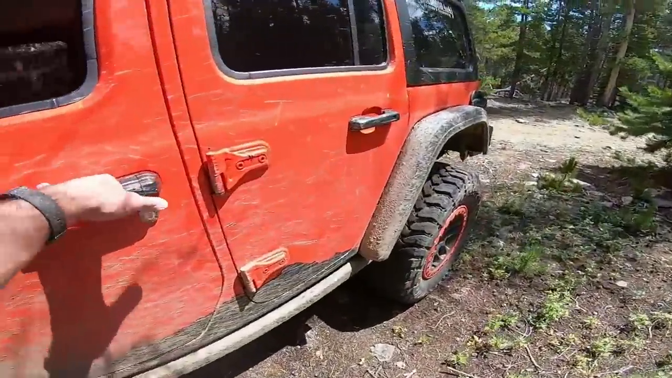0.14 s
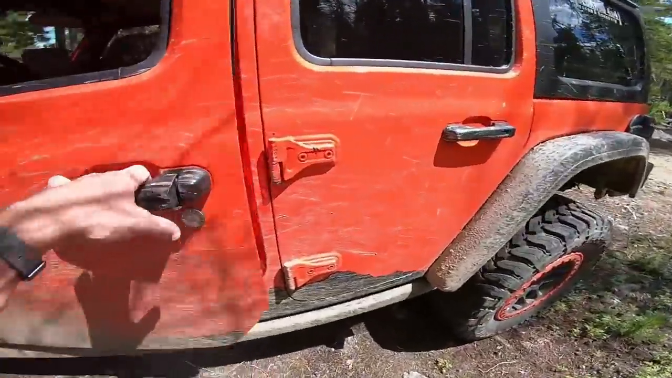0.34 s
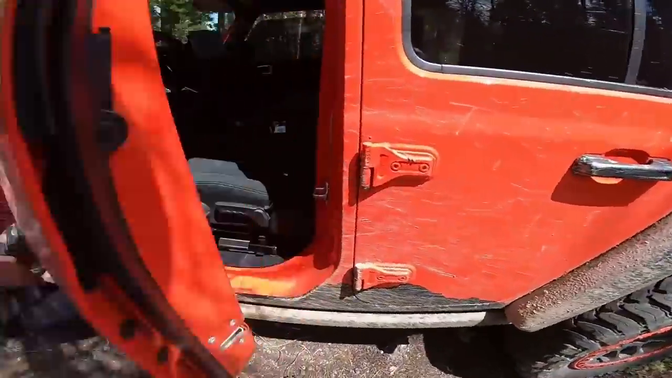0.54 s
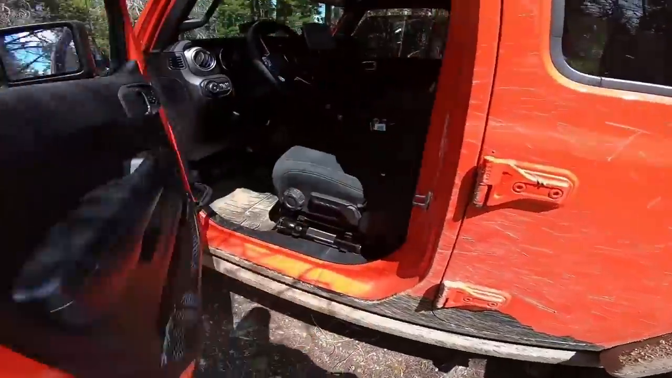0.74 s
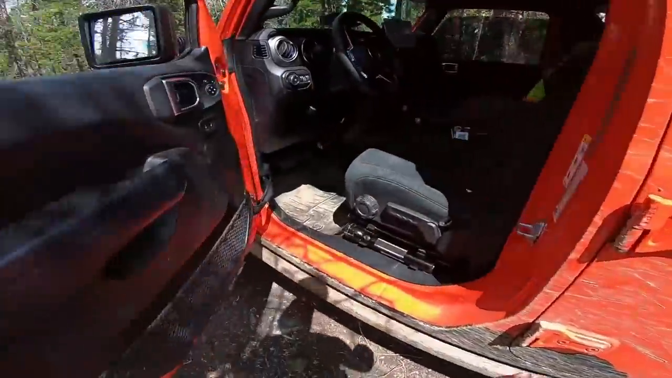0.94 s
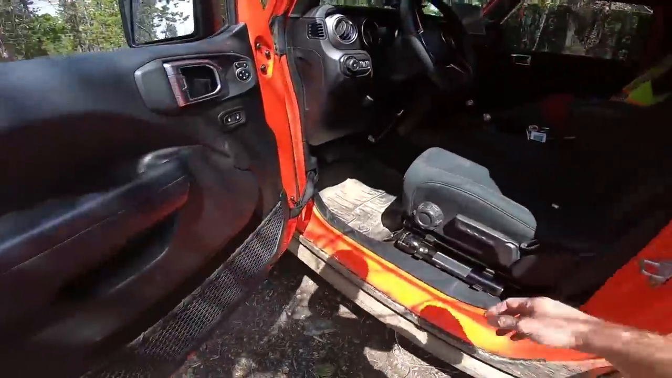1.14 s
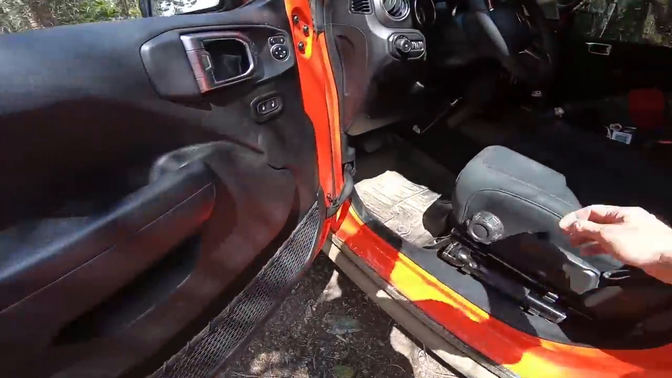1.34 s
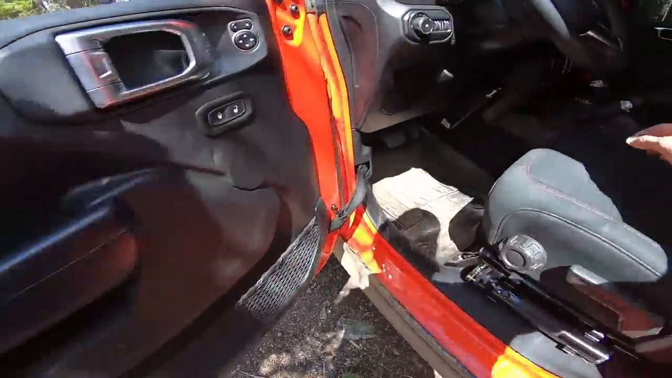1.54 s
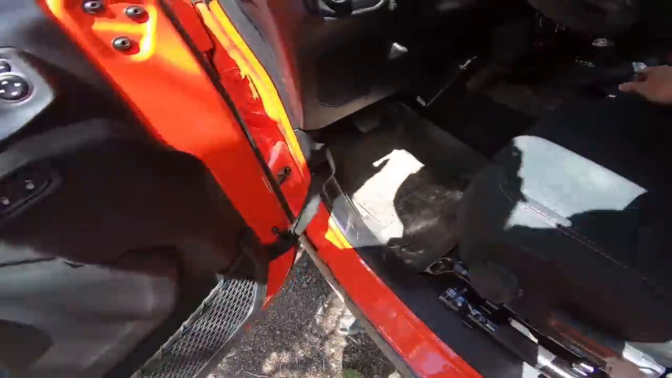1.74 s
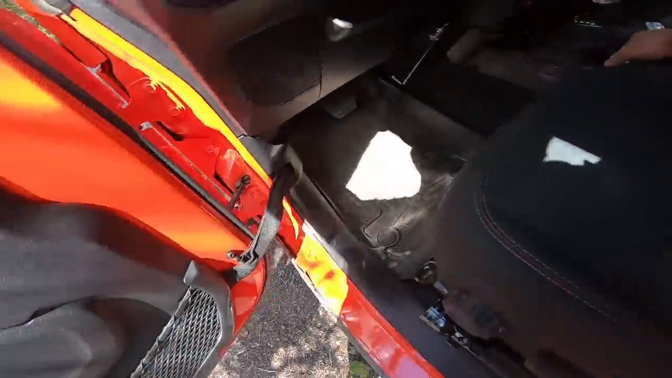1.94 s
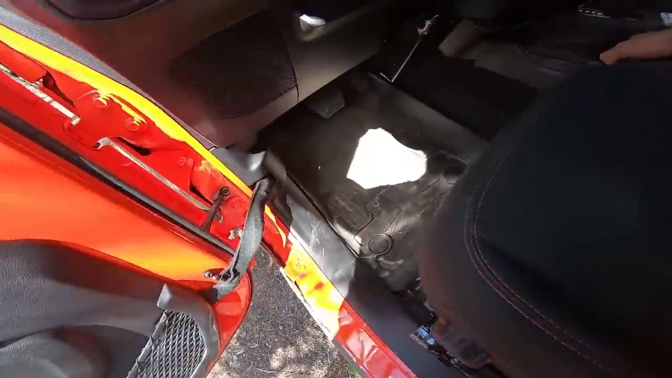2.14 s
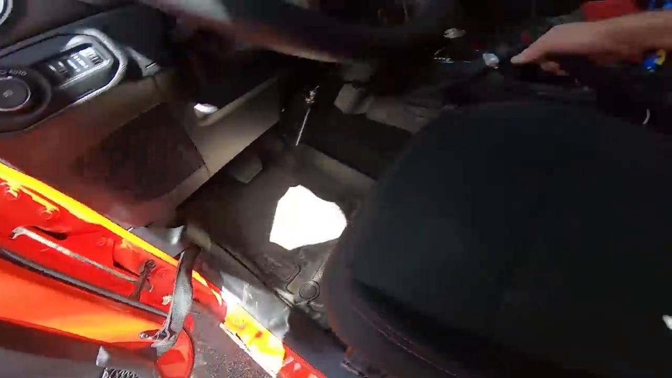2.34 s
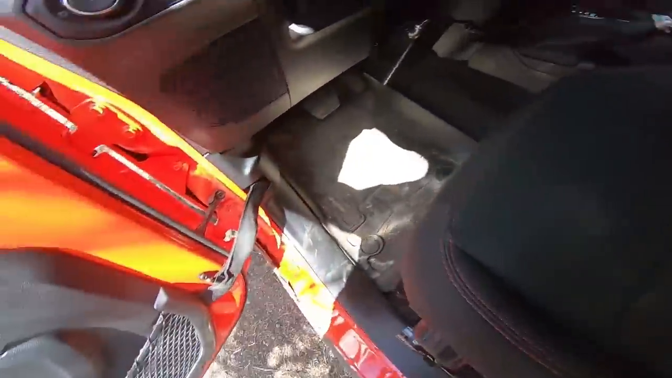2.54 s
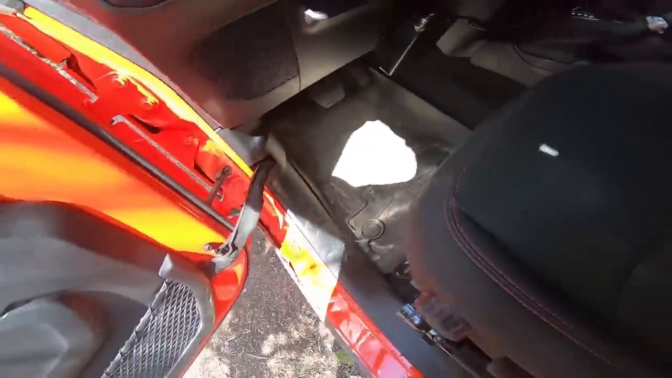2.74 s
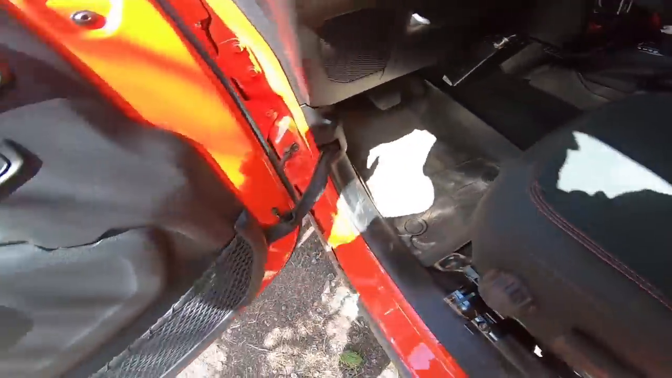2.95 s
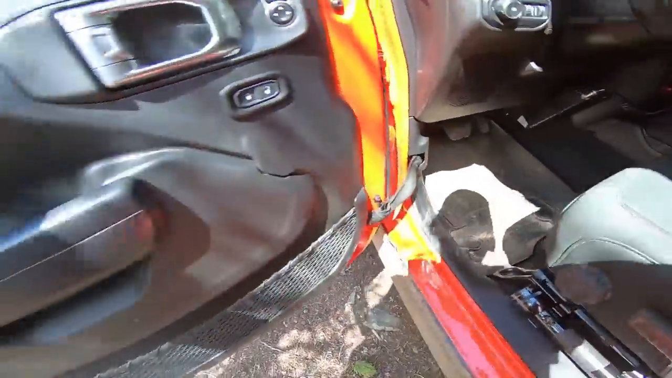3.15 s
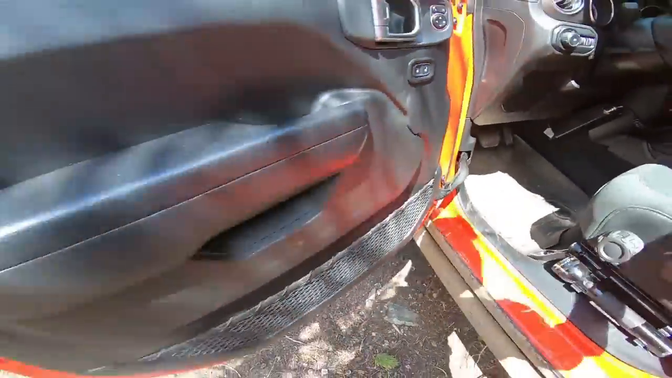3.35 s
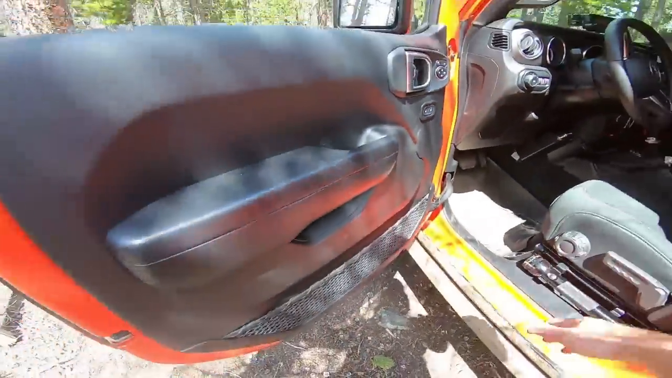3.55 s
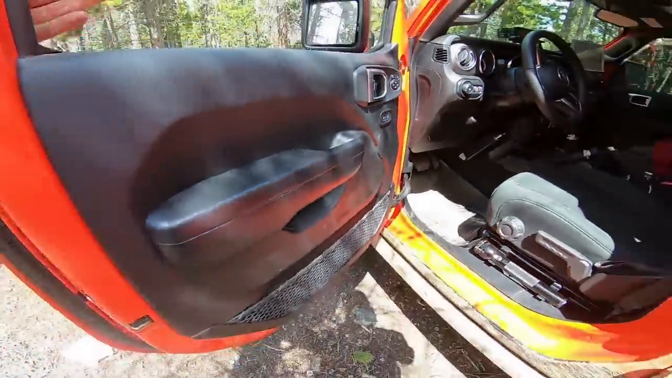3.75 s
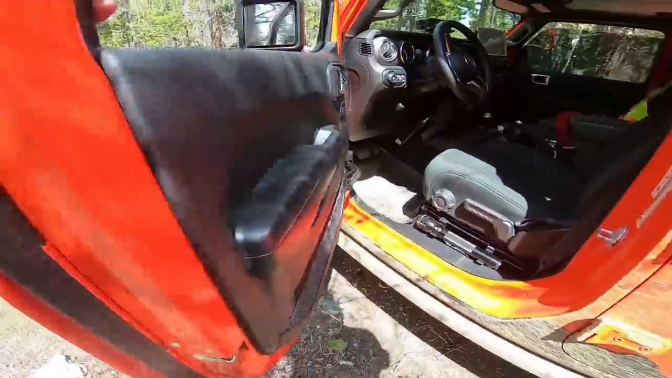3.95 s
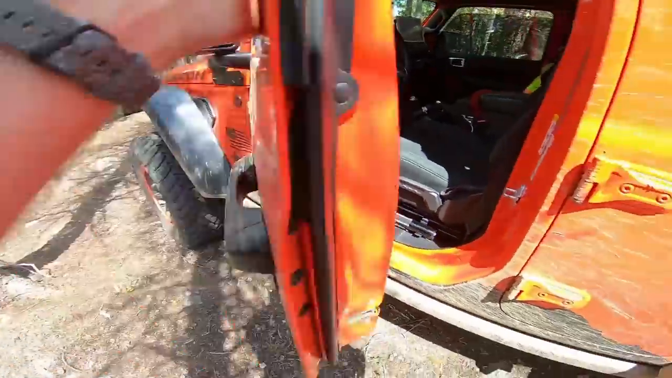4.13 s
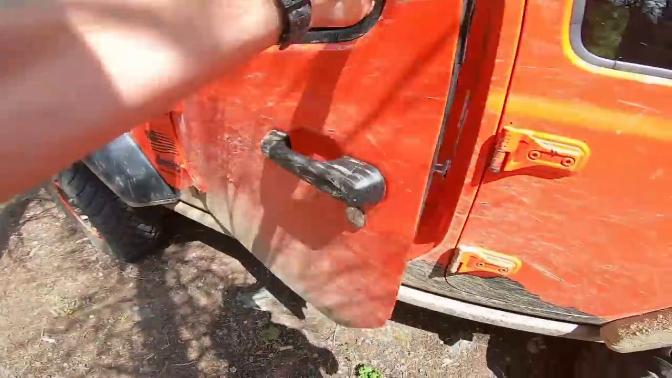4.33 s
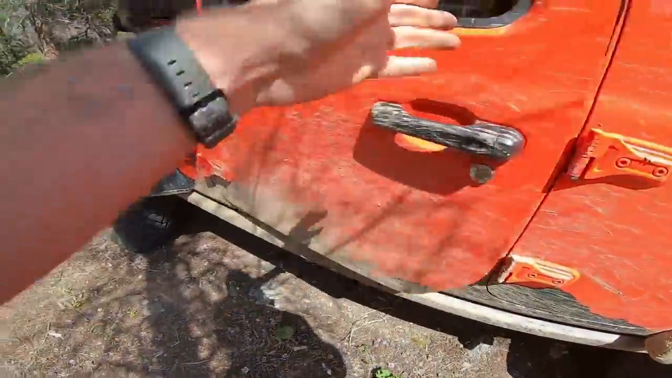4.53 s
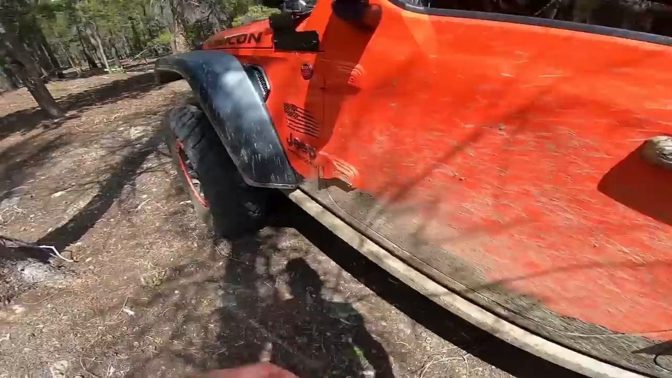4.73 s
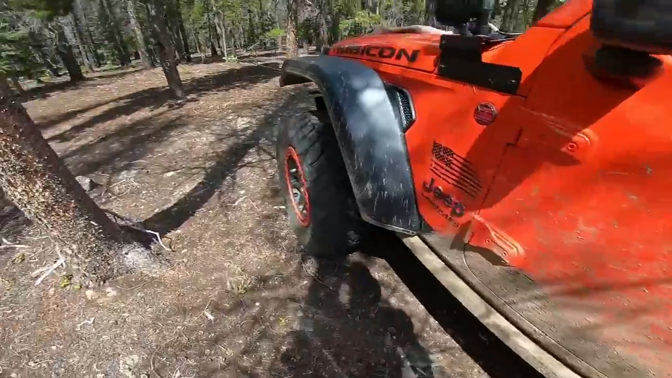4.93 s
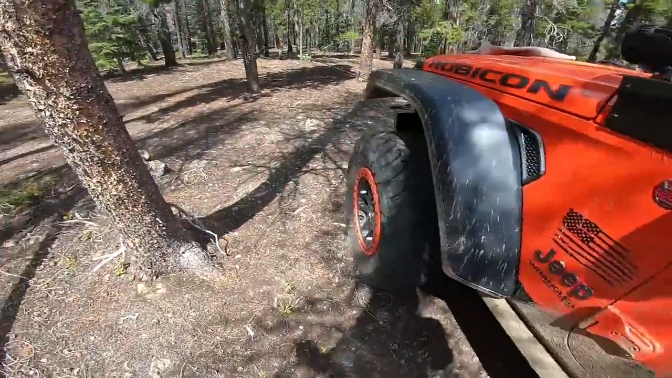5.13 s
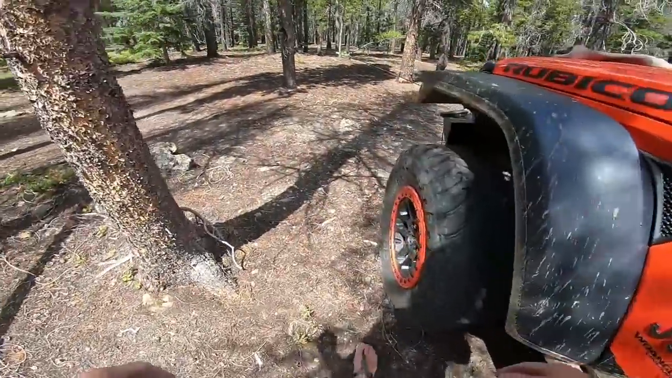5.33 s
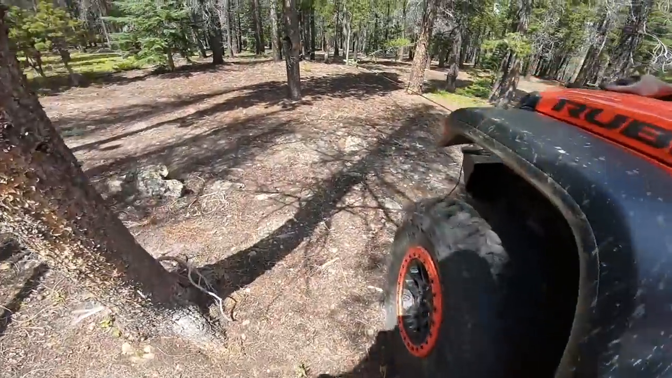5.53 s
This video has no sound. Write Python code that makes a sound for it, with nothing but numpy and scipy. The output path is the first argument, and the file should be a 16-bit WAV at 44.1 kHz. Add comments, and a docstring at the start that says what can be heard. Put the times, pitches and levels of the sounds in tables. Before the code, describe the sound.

A quiet forest with faint steady hiss, heard close up by a small body-worn camera. A hand touches the door handle at about 0.1 s; at 0.3-0.4 s the handle and latch give a tight cluster of hard metallic clunks, with a lighter knock near 0.5 s. The door reaches its stop at 0.75 s with a dull knock. Low wind puffs buffet the microphone from 0.7 to 1.7 s, over cloth rustle and small clicks. A trim knock falls near 2.0 s. At 2.4-2.55 s a lever scrapes with a short dry rasp between deep, boxy thuds. From 3 to 4 s the image narrows nearly to mono, with soft rustling and scuffs. The door knocks at 4.2 s, then slams at 4.75-4.85 s, the loudest event, with heavy low ringing and rattling rebounds. Weak thumps, boot rustle and fine grit crackles fade out by 5.6 s.

```python
"""In a forest, heard by a small worn camera, the handle of an off-road vehicle is pulled, the latch lets go and
the door swings to its stop; then someone leans into the cab, works a lever that rasps and thuds, steps back and
slams the door. Wind puffs on the ports early on, cloth and boots rustle, and the stereo narrows for a while.
Blows excite decaying modes and jolt the camera; clicks, scuffs, rasp, rustle and the low rumble of wind and of
shaking are shaped noise; grit is a train of snaps."""
import sys
import numpy as np
from scipy import signal
from scipy.fft import rfft, irfft, next_fast_len
from scipy.io import wavfile
from scipy.ndimage import uniform_filter1d

SR = 44100
rng = np.random.default_rng(int(sys.argv[2]) if len(sys.argv) > 2 else 0)


def generate_wav(signal):
    """Clip the signal to [-1, 1] and save it as 16-bit WAV at the path in sys.argv[1]."""
    frames = np.transpose(np.atleast_2d(signal))
    scaled = np.clip(frames, -1, 1) * 32767
    pcm = np.round(scaled).astype(np.int16)
    wavfile.write(sys.argv[1], SR, pcm)


N = 246203  # length in samples


def gain_of(db):
    """Level: decibels are twenty times the logarithm of an amplitude factor."""
    return 10 ** (np.asarray(db) / 20)


def evened(x):
    """Normalization: scales a signal to unit rms."""
    return x / np.sqrt(np.mean(x ** 2) + 1e-20)


def spectrum_at(points, hz):
    """Spectral envelope: straight lines between the points on a logarithmic frequency axis."""
    f, value = np.transpose(points)
    return np.interp(np.log(hz + 1), np.log(f + 1), value)


def curves_at(rows, t):
    """Time envelopes: every column of a curve table, interpolated at the times t."""
    s, *rest = np.transpose(rows)
    return [np.interp(t, s, column) for column in rest]


def add(mix, s, sound):
    """Superposition: sums a sound into the mix from s seconds on."""
    part = mix[..., max(round(s * SR), 0):][..., :sound.shape[-1]]
    part += sound[..., :part.shape[-1]]


def left_right(db):
    """Level difference: half goes to each side, positive towards the left."""
    return np.array([[db / 2], [-db / 2]])


def ringing(rings, hz):
    """Resonance: peaks of given bandwidth stand on a flat floor of 1."""
    return 1 + sum(gain_of(db) / abs(1 + 2j * (hz - f) / width) for f, width, db in rings)


def ports(a, b, hz):
    """Coherence: a shared and an opposed part make two ports alike in the bass and less so above."""
    # left-right likeness: f/Hz, correlation before the cavity resonance
    likeness = [(60, 0.96), (300, 0.92), (700, 0.63), (1300, 0.13), (2000, 0.23), (3100, 0.47),
                (6800, 0.19), (15000, 0.15)]
    # cavity between the ports, ringing in opposite phase: f/Hz, bandwidth/Hz, level/dB
    cavity = (1290, 100, 13.5)
    same = np.clip(spectrum_at(likeness, hz), -1, 1)
    mid = np.sqrt((1 + same) / 2)
    side = np.sqrt((1 - same) / 2) * ringing([cavity], hz)
    return np.array([mid * a + side * b, mid * a - side * b])


def pair(gain, seconds):
    """Filtered noise: two partly coherent channels with the spectrum gain(hz), at unit rms."""
    size = next_fast_len(round(seconds * SR))
    hz = np.fft.rfftfreq(size, 1 / SR)
    a, b = rfft(rng.standard_normal((2, size)))
    return evened(irfft(ports(a, b, hz) * gain(hz), size))


def struck(blows, modes, dense_db, shudder_s):
    """Modal excitation: a soft push and a short shudder drive a set of decaying modes."""
    t = np.arange(2 * SR // 5) / SR
    hz, level_db, t60 = np.transpose(modes)[:, :, None]
    fall = gain_of(level_db - 60 * t / t60) * np.cos(np.pi / 2 * t / t[-1])
    signs = (-1) ** np.arange(len(modes))
    ring = signs @ (fall * np.sin(2 * np.pi * hz * t))
    out = np.zeros(N)
    noise = rng.standard_normal((len(blows), SR // 8))
    # detuning and phase of small neighbouring modes, drawn anew for each blow
    near = rng.uniform(-1, 1, (len(blows), 2, len(modes), 1))
    for (s, db, contact_ms, shudder_db), jitter, (tune, turn) in zip(blows, noise, near):
        dense = (fall * np.sin(2 * np.pi * hz * (1 + .1 * tune) * t + np.pi * turn)).sum(0)
        dense *= gain_of(dense_db) * np.minimum(t / 0.0054, 1)
        force = jitter * gain_of(-60 * t[:len(jitter)] / max(shudder_s, .005))
        force *= gain_of(shudder_db) / np.linalg.norm(force)
        force[0] += 1  # the blow itself
        push = signal.windows.hann(max(int(contact_ms * SR / 1000), 3))
        sound = signal.fftconvolve(signal.fftconvolve(force, push), ring + dense)
        add(out, s, gain_of(db) * sound / abs(sound).max())
    return out


def click(db, ring_hz, low_db, high_db, t60, pan_db, rise_ms=1.0):
    """Damped impact: broad noise whose treble dies first, with a rough short ring of the part hit."""
    # latch and panels: f/Hz, bandwidth/Hz, level/dB
    metal = [(1830, 100, -2.5), (2450, 160, -6.5), (3030, 170, -2.5), (4100, 250, -5.5), (5050, 310, -3)]
    ring_spread = .22  # half-amplitude width as a share of the ringing frequency
    ring_db, ring_soft_db_per_ms = -.6, .4  # a soft contact rings less
    ring_share, ring_loss_per_db = 0.23, 0.06  # the thinner the part (the less low mids), the more it rings
    broad = [(150, low_db - 6.5), (700, low_db + 5.5), (2500, 0.016),
             (7500, high_db), (9500, high_db - 3.0), (11500, high_db - 26.0)]  # f/Hz, level/dB
    noise = pair(lambda hz: gain_of(spectrum_at(broad, hz)) * ringing(metal, hz), .25)
    t = np.arange(noise.shape[1]) / SR
    t60 = max(t60, .008)
    share = np.clip(ring_share - ring_loss_per_db * low_db, 0, 1)
    rise = np.minimum(t / (max(rise_ms, .2) / 1000), 1)
    t = np.maximum(t - rise_ms / 1000, 0)  # the decay starts after the rise

    dull = signal.sosfilt(signal.butter(2, 1800, fs=SR, output="sos"), noise)
    bright = noise - dull
    tail = gain_of(-23 - 60 * t / 0.34)  # nearby panels leave a short tail
    burst = dull * (gain_of(-60 * t / t60) + tail)
    burst = burst + bright * (gain_of(-60 * t / (0.75 * t60)) + 0.8 * tail)

    tone = pair(lambda hz: 1 / (1 + (2 * (hz - ring_hz) / (ring_spread * ring_hz)) ** 2), .25)
    tone = tone * gain_of(-60 * t / (0.8 * t60))
    tone_gain = share * gain_of(ring_db - ring_soft_db_per_ms * rise_ms)
    return ((1 - share) * burst + tone_gain * tone) * rise * gain_of(db + left_right(pan_db))


def hush():
    """Stationary noise: the quiet forest and the camera's own hiss share one steady spectrum."""
    # f/Hz, relative spectral level/dB per Hz
    hush_colour = [(140, -47.5), (230, -15), (419, -1), (483, -15.5), (607, -5.5), (995, -8.5),
                   (1660, -2.5), (2490, -16), (3370, -13), (8880, -22.5), (15600, -62)]
    hush_db = -69.5
    return gain_of(hush_db) * pair(lambda hz: gain_of(spectrum_at(hush_colour, hz)), N / SR)[:, :N]


def rumble():
    """Incoherent low noise: rumble of wind on the ports, and of the shaken camera and car body after thuds."""
    # low rumble, before its lumps: t/s, deep rumble level/dB, upper rumble level/dB
    rumble_levels = [(0.0, -41, -63), (0.09, -67, -73), (0.5, -54, -66), (0.71, -34, -41.5),
                     (0.84, -29, -25), (1.0, -36.5, -36), (1.21, -35, -37.5), (1.36, -32, -55.5),
                     (1.55, -37.5, -36), (1.74, -37.5, -59), (1.97, -65, -65), (2.14, -54, -55),
                     (2.44, -63, -54), (2.58, -41, -31), (2.69, -30, -43), (2.88, -50.5, -55),
                     (3.05, -48, -47), (3.15, -54, -63), (3.35, -46, -47), (3.55, -41, -44),
                     (3.7, -61, -70), (3.92, -44.5, -52), (4.15, -72.5, -75), (4.38, -49.5, -57),
                     (4.66, -57, -66), (4.76, -46, -40), (4.96, -47, -35.5), (5.12, -56, -52),
                     (5.27, -64, -61.5), (5.35, -74.5, -79), (5.58, -63.5, -81)]
    # gusts that slap a port: t/s, peak level/dB (mean of both ports), length/ms, left-right difference/dB
    puffs = [(0.71, -27, 13.6, 10), (0.808, -29, 12.4, -1), (0.882, -22, 20.4, 16), (0.947, -27, 22.7, 21),
             (1.13, -35, 13, 3.0), (1.243, -23, 20.1, 17.5), (1.338, -32, 24.5, 16),
             (1.584, -29.5, 15.8, -21.5), (1.617, -33, 22, -26.5), (1.709, -40.5, 17, 15)]

    def band(x, lo_hz, hi_hz):
        """Band-pass filtering: keeps one range of the noise, at unit rms."""
        sos = signal.butter(2, [lo_hz, hi_hz], "band", fs=SR, output="sos")
        return evened(signal.sosfilt(sos, x))

    deep_db, upper_db = curves_at(rumble_levels, np.arange(N) / SR)
    noise = rng.standard_normal((3, 2, N))
    lumps = evened(uniform_filter1d(uniform_filter1d(noise[2], 900), 900))
    out = gain_of(deep_db) * band(noise[0], 28, 42.5) + gain_of(upper_db) * band(noise[1], 37, 120)
    out *= gain_of(3.45 * lumps)
    for s, db, ms, side_db in puffs:
        u = np.linspace(-2.5, 2.5, int(ms * SR / 1000))
        swing = (2 * u ** 2 - 1) * np.exp(-u ** 2)  # a dip between two rises
        add(out, s, swing * gain_of(db + left_right(side_db)))
    return out


def rustle():
    """Stick-slip friction: patchy noise in three ranges flickers as cloth and grit slip."""
    # clothes, hand and boots: t/s, mids level/dB, low mids level/dB, treble level/dB
    strength = [(0.0, -53.5, -56.5, -67), (0.22, -56, -56, -73.5), (0.36, -42.5, -44.5, -55),
                (0.6, -58.5, -53.5, -68.5), (0.76, -53.5, -41, -70), (0.95, -66.5, -63, -79.5),
                (1.15, -46, -58.5, -62.5), (1.3, -60, -73, -71.5), (1.6, -51.5, -55, -63.5),
                (1.93, -57, -57, -68), (2.15, -53.5, -54.5, -60), (2.41, -54.5, -66.5, -66.5),
                (2.52, -45.5, -50, -54.5), (2.8, -60, -62, -73), (3.0, -46, -47, -67),
                (3.25, -43.5, -42, -68.5), (3.5, -48.5, -51.5, -68.5), (3.84, -44.5, -45, -66.5),
                (4.05, -52.5, -53, -71), (4.15, -55, -56, -72), (4.5, -50.5, -51.5, -68.5),
                (4.72, -59.5, -56.5, -84), (4.88, -50.5, -42, -67.5), (5.05, -67, -63, -81.5),
                (5.25, -73, -71, -87), (5.58, -60, -70.5, -70)]
    # f/Hz, relative spectral level/dB per Hz
    cloth_colour = [(90, -22), (150, -3.5), (307, -8.5), (468, -13), (761, -17.5), (1400, -23.5),
                    (3340, -28), (4590, -30.5), (5430, -30), (7300, -31.5), (9020, -35), (12100, -47),
                    (15600, -73)]
    # f/Hz, bandwidth/Hz, level/dB
    cloth_rings = [(720, 140, 1), (1520, 310, 0.5), (2173, 360, 0.5), (3040, 400, -3), (3355, 180, -1),
                   (4160, 620, -7.5), (4300, 390, -6)]
    frames, hz = N // 128 + 5, np.fft.rfftfreq(512, 1 / SR)
    a, b, c, d, patches = rng.standard_normal((frames, 257, 5)).transpose(2, 0, 1)
    # flicker: slow patches in frequency-time, quick slips in all bands, broad strokes
    patches = evened(uniform_filter1d(uniform_filter1d(patches, 40, 0), 2, 1))
    slips = evened(uniform_filter1d(rng.standard_normal(frames), 4))[:, None]
    strokes = rng.standard_normal((frames, 257))
    strokes = evened(uniform_filter1d(uniform_filter1d(strokes, 150, 1), 18, 0))
    flicker_db = 2.57 * patches + 1.58 * slips + 1.3 * strokes

    colour = gain_of(spectrum_at(cloth_colour, hz)) * ringing(cloth_rings, hz)
    z = ports(a + 1j * b, c + 1j * d, hz) * colour * gain_of(flicker_db)
    low = spectrum_at([(850, 1), (1150, 0.16)], hz)
    high = spectrum_at([(4800, 0), (5300, 0.95)], hz)
    out = 0
    for share, level_db in zip((1 - low - high, low, high), curves_at(strength, np.arange(N) / SR)):
        part = signal.istft((z * share).transpose(0, 2, 1), nperseg=512, noverlap=384)[1][:, :N]
        out = out + evened(part) * gain_of(level_db)
    return out


def grit():
    """Random impulse train: grit and needles crackle under the boots in snaps of a few cycles."""
    start_s, start_db, fade_db_per_s = 4.88, -68, -8
    snaps_per_s = 220
    size = gain_of(4.5 * np.minimum(rng.exponential(1, N), 3)) * (rng.random(N) < snaps_per_s / SR)
    kind = rng.integers(0, 8, N)
    t = np.arange(300) / SR
    sound = 0
    for k, hz in enumerate(np.geomspace(1600, 3200, 8)):
        snap = t * gain_of(-60 * t / 0.0025) * np.sin(2 * np.pi * hz * t)
        sound = sound + signal.oaconvolve(size * (kind == k), snap)[:N]
    end_s = N / SR
    end_db = start_db + fade_db_per_s * (end_s - start_s)
    level_db = np.interp(np.arange(N) / SR, [start_s, end_s], [start_db, end_db], left=-120)
    return evened(sound) * gain_of(level_db + left_right(-6))


def scuffs():
    """Slow contact: softer-edged noise of cloth, seat and soles, and of the door closing just before the slam."""
    # t/s, level/dB, ringing f/Hz, low mids level/dB, treble level/dB, t60/s of the dull part
    scuff_rows = [(0.6628, -45, 1240, -14, -7, 0.08), (1.0318, -45, 1425, 5, -15, 0.082),
                  (1.0975, -50, 1380, 0, -30, 0.065), (1.1982, -47.5, 1530, 0, -13, 0.11),
                  (1.316, -49, 2620, -18, -17, 0.046), (1.4296, -43, 1910, -0.5, -4.5, 0.41),
                  (1.492, -42.5, 1630, -8, -7, 0.21), (1.5456, -43, 1630, -18, -21, 0.045),
                  (1.8522, -44, 1230, 4, -44, 0.17), (2.0937, -47, 1340, 0, -24, 0.19),
                  (2.18, -43.5, 3300, -3, 2, 0.15), (2.8493, -43, 1960, -8, -13, 0.33),
                  (3.325, -41, 3110, -22, -23, 0.098), (3.3994, -41, 1470, -2, -20, 0.12),
                  (3.513, -40.5, 2650, -21, -24, 0.047), (3.5644, -40, 4060, -25, -12, 0.034),
                  (3.7053, -40, 1800, -13, -22, 0.27), (3.7436, -38, 2460, -10, -19, 0.12),
                  (3.7786, -38, 2115, -19, -24, 0.18), (3.9364, -40, 1790, -8, -22, 0.09),
                  (4.373, -44, 1604, -12, -27, 0.031), (4.4783, -43, 1710, -6, -22, 0.24),
                  (4.5304, -46.5, 1600, -7.5, -4, 0.16), (4.728, -47, 1500, 5, -15, 0.1),
                  (4.7454, -18, 1145, 8.5, -23, 0.13)]
    rise_ms, pan_db = 9.5, -2
    out = np.zeros((2, N))
    for s, *row in scuff_rows:
        add(out, s, click(*row, pan_db, rise_ms))
    return out


def clicks():
    """Hard impact: an abrupt contact makes the clicks of latch, trim, lever and stones."""
    # t/s, level/dB, ringing f/Hz, low mids level/dB, treble level/dB, t60/s of the dull part,
    # left-right difference/dB
    click_rows = [(0.1034, -44.5, 4160, -13, -23, 0.082, -5), (0.1101, -46.5, 1440, -16, -14, 0.077, 1.0),
                  (0.2987, -40, 2990, 26, -2, 0.14, -1), (0.3142, -24.5, 1280, 3.5, -12.5, 0.11, 3),
                  (0.3356, -12.5, 2450, -1.5, -21.5, 0.042, 5), (0.3464, -15, 1520, 14.5, -15.5, 0.082, 1),
                  (0.3745, -24, 1400, 7, -15, 0.04, 9), (0.3894, -20.5, 1406, 16.5, -15, 0.074, 2),
                  (0.4978, -30, 3270, -5, -12.5, 0.019, 3), (0.5836, -48.5, 1950, -10, -10, 0.063, -3),
                  (0.7123, -33, 5300, -18, 1, 0.016, -4), (0.7357, -19.5, 1130, 13, -13.5, 0.036, 3.5),
                  (0.7492, -19.5, 1240, 14.5, -21, 0.056, 1), (0.7891, -36.5, 1270, -14, -26, 0.036, 6),
                  (0.9742, -48.5, 2380, -21, -11, 0.16, -10), (1.0056, -41, 2360, 2.5, -1, 0.12, -0.5),
                  (1.1363, -39, 3030, 3, 1, 0.054, -2), (1.5638, -39, 1570, -18, -15, 0.083, -8),
                  (1.6771, -37, 2080, -15, -14, 0.14, -7), (1.7185, -23.5, 2120, -33, -7, 0.035, -8),
                  (1.7569, -41, 2160, -20, 6, 0.055, -4.0), (1.9649, -28.5, 1220, 22.5, -5.5, 0.12, 2),
                  (1.9889, -17.5, 1370, 7.5, -18.5, 0.054, 1), (2.2952, -43.5, 2120, -5, 6, 0.034, 5),
                  (2.3989, -34, 3040, 8, -2, 0.18, -2), (2.5446, -19, 2120, 9, -8.5, 0.073, -0.5),
                  (2.5775, -20, 1300, -8, -39, 0.076, -0.5), (2.6334, -45, 3060, -1, -3.5, 0.17, -5),
                  (2.9497, -41.5, 1500, 11, -11, 0.06, 7), (3.65, -38, 1000, 5, -18, 0.042, 1),
                  (3.8244, -33, 3250, 8, -12.5, 0.049, 0.0), (3.8766, -36.5, 3420, -12, -3, 0.041, -6),
                  (4.2228, -33, 1215, 16, -13.5, 0.078, -1), (4.2657, -39.5, 2340, 5, -9.5, 0.1, 0),
                  (4.4553, -40.5, 3090, -8, -15.5, 0.17, 0.5), (4.7556, -14, 1212, 29, -31, 0.13, -2.5),
                  (4.7674, -10, 1760, 7, -8, 0.049, -2), (4.7764, -15, 1197, 9.5, -7.5, 0.12, 0.5),
                  (4.7974, -22, 2900, -7, -11, 0.12, -4), (4.8094, -21.5, 1990, 26, -9.5, 0.14, 4),
                  (4.8484, -27, 2900, 4.5, -22, 0.096, -1), (4.9054, -31, 1190, 20, -31.5, 0.047, -4.5),
                  (4.9741, -32.5, 1200, 11, -41, 0.038, 0), (5.0619, -50, 2510, -6, -11, 0.05, -3.5),
                  (5.1183, -50.5, 2580, -19.5, -39.5, 0.032, -8),
                  (5.1821, -51, 2440, -11.5, -34.5, 0.025, -7), (5.2091, -52, 650, -10, -30, 0.033, -6),
                  (5.2969, -49, 2800, -16.5, -35.5, 0.036, -6),
                  (5.3647, -49, 2390, -16.5, -33, 0.035, -5.5), (5.4989, -48, 1660, -0.5, -13.5, 0.04, -6)]
    out = np.zeros((2, N))
    for s, *row in click_rows:
        add(out, s, click(*row))
    return out


def rasp():
    """Dry friction: the lever scrapes densely in a thin metal part and flutters as it slips."""
    # f/Hz, relative spectral level/dB per Hz
    scrape_colour = [(240, -19.5), (400, 0), (634, -11.5), (695, -3), (989, -2.5), (1320, -11),
                     (2130, -0.5), (2520, -4.5), (3080, -2.5), (7840, -10), (8860, -8), (10500, -13.5),
                     (11500, -42), (13800, -20), (15600, -31)]
    # f/Hz, bandwidth/Hz, level/dB
    scrape_rings = [(2200, 83, -3), (3450, 120, -6.5), (8780, 250, 2), (9110, 60, -3)]
    bite_s, hold_s, release_s = 0.036, .075, 0.023  # the lever takes up slack, bites, lets go
    bite_db, slack_db, sag_db, end_db = -16, -25, -8, -48.5  # level, then each stage relative to it
    t = np.arange(0, bite_s + hold_s + release_s, 1 / SR)
    noise = pair(lambda hz: gain_of(spectrum_at(scrape_colour, hz)) * ringing(scrape_rings, hz), .2)
    flutter = evened(uniform_filter1d(rng.standard_normal(len(t)), 50))
    stages = np.cumsum([0, bite_s - .005, .005, hold_s, release_s])
    level_db = bite_db + np.interp(t, stages, [slack_db, slack_db + 9, 0, sag_db, end_db])
    return noise[:, :len(t)] * gain_of(level_db + 1.8 * flutter)


def cab():
    """Modal ringing: thuds inside excite modes of the cab, the lowest being the jolt of the camera."""
    # t/s, peak level/dB, contact/ms, shudder level/dB
    thuds = [(1.854, -36.5, 2.2, -10), (1.963, -31.5, 1.1, -14), (2.037, -28.5, 3.3, 9),
             (2.394, -28, 2.5, 0), (2.41, -18, 3, -12), (2.433, -12.5, 4.4, -3), (2.454, -12, 3.1, -4.5),
             (2.479, -17, 3, -17), (2.549, -8, 2.64, 1.5), (2.559, -15, 2.8, -1), (2.769, -40, 3.4, -8),
             (2.94, -36, 1.8, -11), (3.298, -30.5, 3.4, 13), (3.379, -37, 2.4, 17), (3.812, -44, 1.1, -12),
             (4.475, -30.5, 1.7, -4)]
    # modes of the cab, the lowest being the jolt of the camera: f/Hz, relative level/dB, t60/s
    cab_modes = [(33, -16, .25), (53, -12, 0.26), (109.4, -2.5, 0.18), (138.7, -7.5, 0.12),
                 (176.5, -7.5, 0.14), (220.5, -10.5, 0.15), (251.6, -13, 0.24), (316, -15, .08),
                 (384, -18, 0.088), (644, -20.5, 0.11), (950, -19, .07)]
    return struck(thuds, cab_modes, dense_db=-4.5, shudder_s=0.049)


def door():
    """Modal ringing: blows on handle and open door excite modes of the door, the lowest the camera's jolt."""
    # t/s, peak level/dB, contact/ms, shudder level/dB
    door_blows = [(0.114, -26.5, 3.5, 0), (0.143, -35, 3.6, 2), (0.298, -36, 1.5, 1),
                  (0.322, -12.5, 2.2, 2), (0.34, -10.5, 1.6, 7.5), (0.351, -11.5, 3.1, 1.5),
                  (0.384, -13.5, 3.5, 7), (0.411, -22.5, 4.2, 4), (0.472, -23.5, 3.3, 2),
                  (0.734, -26.5, 1.9, -5), (0.755, -20.5, 2, 14), (4.169, -42, 2.5, 3),
                  (4.212, -17.5, 2.66, -0.5), (4.232, -20.5, 2.5, 3.5), (4.269, -24, 2.7, 2.5),
                  (4.319, -31, 3, 0)]
    # modes of the door, the lowest being the jolt of the camera: f/Hz, relative level/dB, t60/s
    door_modes = [(36, -11, .25), (75.6, -7, 0.5), (111.7, -2.5, 0.28), (146.7, -2, 0.32),
                  (168.2, -2, 0.19), (217.6, -6, 0.17), (248.7, -10, 0.18), (293.4, -3, 0.12),
                  (396.3, -10.5, 0.19), (449, -11.5, 0.17), (505, -12, .12), (576, -18, 0.12),
                  (654, 0, 0.083), (703, -10, 0.16), (770, -41, .1), (915, -51, .1), (1240, -36, .1)]
    return struck(door_blows, door_modes, dense_db=-6.5, shudder_s=.055)


def slam():
    """Coupled modes: the slam and its rebounds make door and body ring as one."""
    # t/s, peak level/dB, contact/ms, shudder level/dB
    slam_blows = [(4.756, -11, 2.3, 9.5), (4.767, -6.5, 0.95, 0.5), (4.782, -6, 1.33, 2.5),
                  (4.803, -2.5, 1.5, -5), (4.813, -10.5, 1.8, -5), (4.855, -13, 2, 2.5),
                  (4.906, -19.5, 2, -2), (4.965, -28.5, 3.6, 6.5)]
    # f/Hz, relative level/dB, t60/s
    body_modes = [(47.33, -12.5, 0.85), (64.7, -9.5, 0.54), (83.3, -15.5, 0.67), (120.9, -7, 0.38),
                  (147.3, -4.5, 0.28), (173, 3, 0.2), (205.3, -2, .18), (257, -10, 0.25),
                  (291.4, -13, 0.21), (336.6, -9.5, 0.15), (374.6, -5, 0.14), (447, -11.5, 0.27),
                  (490, -13.5, .18), (587, -16, 0.087), (619, -13, 0.28), (710, -14, 0.23),
                  (735, -18.5, 0.19), (870, -15, 0.072), (1240, -25.5, .14), (1880, -25.5, .2),
                  (2960, -26.5, 0.22)]
    return struck(slam_blows, body_modes, dense_db=-2.2, shudder_s=.04)


def scene():
    """Superposition: the pressures of all sources add at the two ports."""
    mix = hush() + rumble() + rustle() + grit() + scuffs() + clicks()
    add(mix, 2.398, rasp())
    return mix + cab() + door() + slam()


def record(dry):
    """Mid-side scaling, saturation, band limit: width fades, the highest peaks round off, the top is cut."""
    # t/s, stereo width 0-1 below the split, stereo width 0-1 above it
    stereo_width = [(0, 0.71, 1), (2.75, 0.73, 1), (2.95, 0.083, 0.67), (3.3, 0.017, .4),
                    (3.55, 0.0083, .15), (4.0, 0.0071, 0.13), (4.2, 0.092, .6), (4.5, 0.21, .7),
                    (4.72, 0.4, 0.4), (5.58, 0.88, 1)]
    split_hz, edge_hz = 5000, 15700
    low_width, high_width = np.clip(curves_at(stereo_width, np.arange(N) / SR), 0, 1)
    mid, side = dry.mean(0), (dry[0] - dry[1]) / 2
    low = signal.oaconvolve(side, signal.firwin(255, split_hz, fs=SR), "same")
    side = low * low_width + (side - low) * high_width
    both = np.array([mid + side, mid - side])
    rounded = both / (1 + abs(both / .95) ** 4) ** .25
    band_limit = signal.firwin(511, edge_hz, window=("kaiser", 9), fs=SR)
    return signal.oaconvolve(rounded, band_limit[None], "same")


dry = scene()
out = record(dry)
generate_wav(out)
```